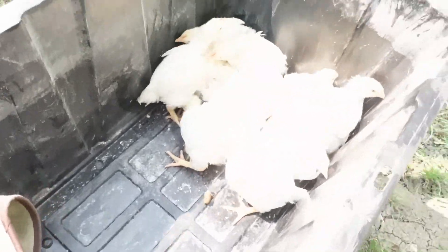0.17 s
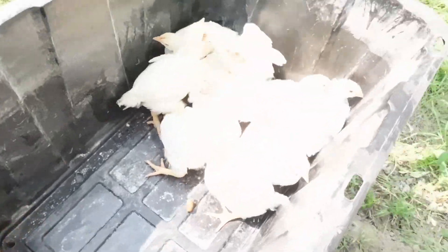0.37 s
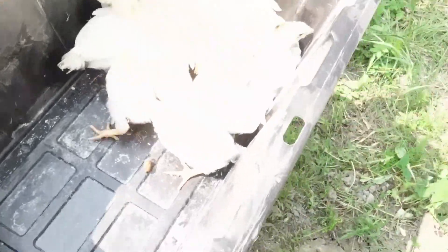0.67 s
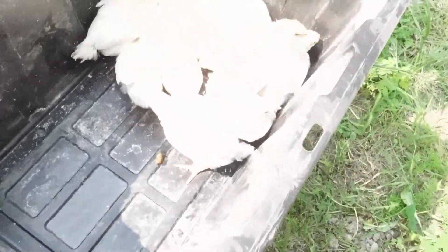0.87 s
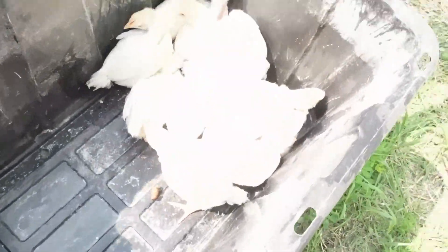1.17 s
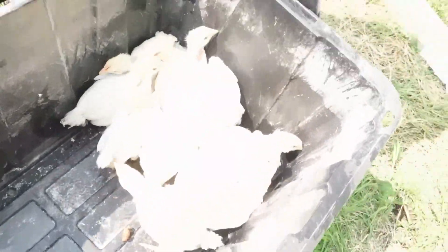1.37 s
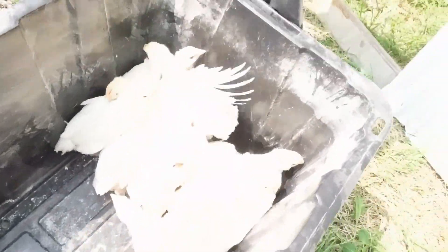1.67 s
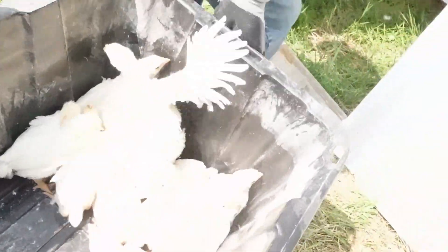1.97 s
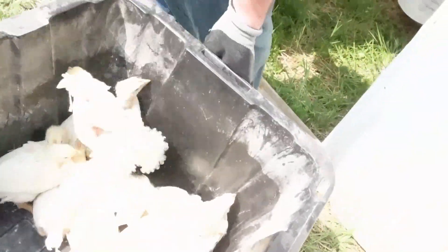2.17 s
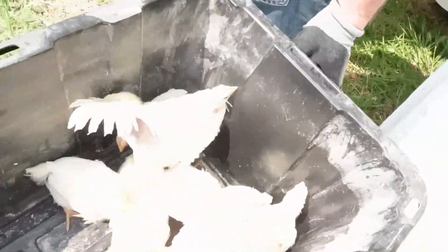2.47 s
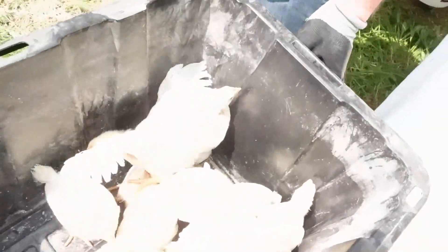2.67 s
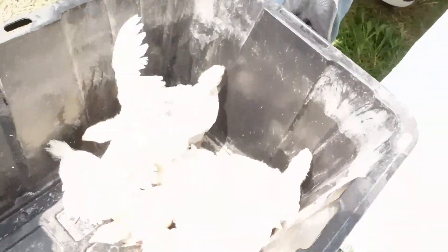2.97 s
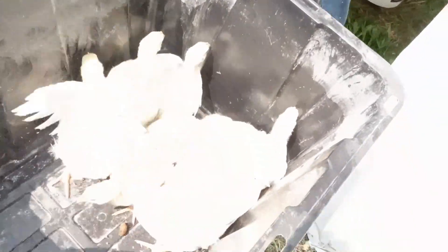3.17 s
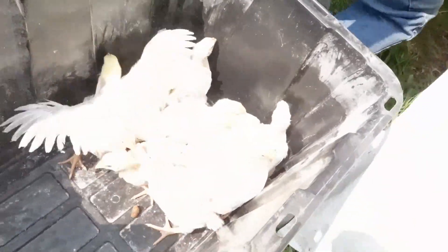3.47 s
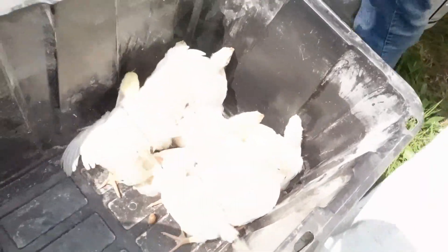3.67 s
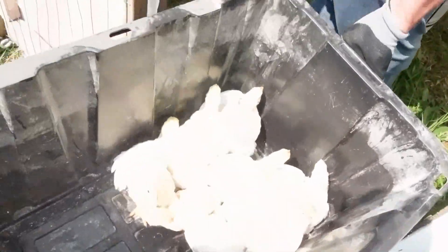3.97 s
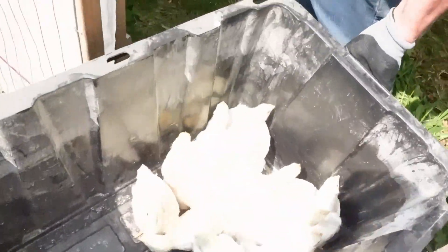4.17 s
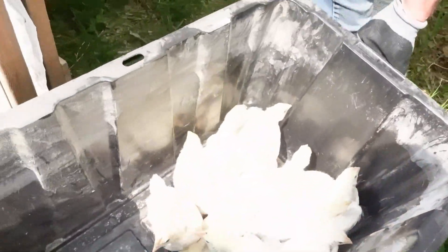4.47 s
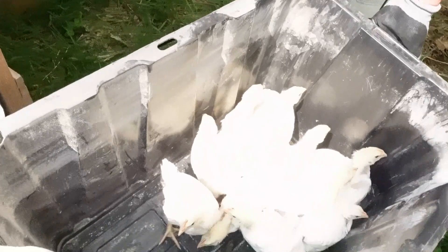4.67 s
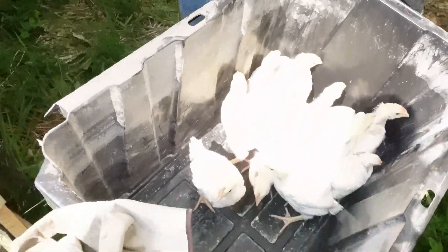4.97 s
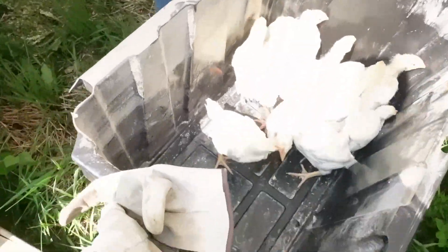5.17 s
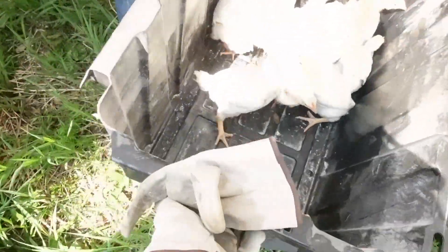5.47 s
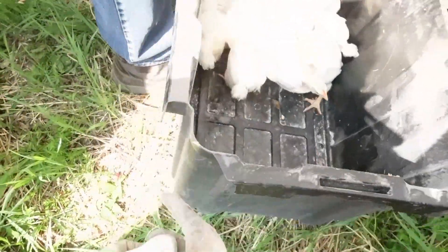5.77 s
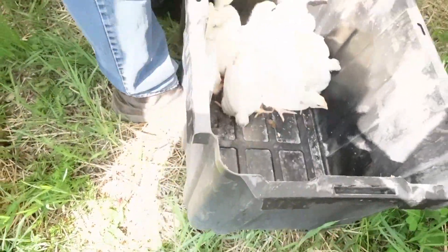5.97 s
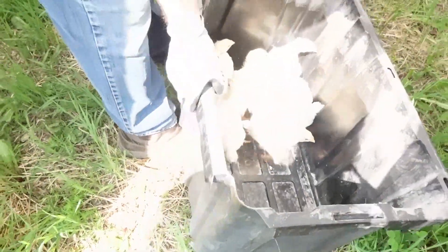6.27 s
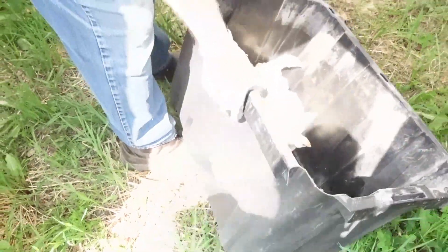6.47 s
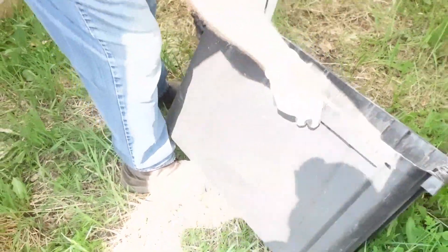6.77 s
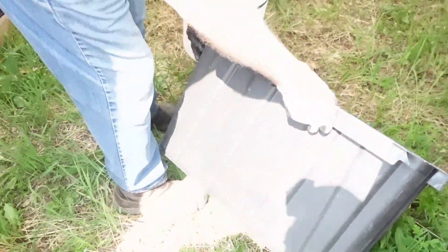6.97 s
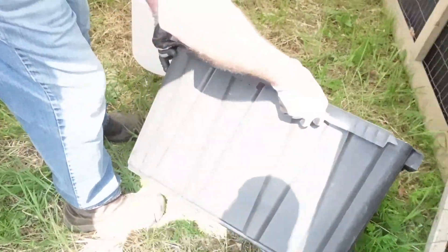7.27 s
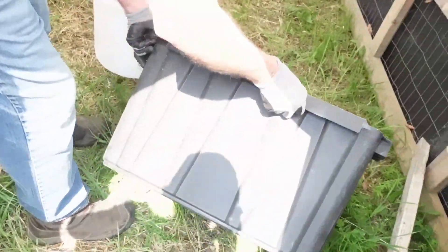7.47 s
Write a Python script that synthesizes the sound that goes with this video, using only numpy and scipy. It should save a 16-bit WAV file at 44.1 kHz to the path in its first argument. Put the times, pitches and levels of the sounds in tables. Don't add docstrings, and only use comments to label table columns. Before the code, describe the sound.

Close above a plastic bin outdoors, young chickens utter short, near-pure whistles that slide quickly downward, over faint steady air. From 0 to 1.5 seconds the peeps come often; claws scramble and the rim gives a buzzing creak at about 0.4 to 0.6. From 1.5 to 2.3 wings beat and rustle, claws tick sharply, the plastic knocks, and calls become shrill, wavering warbles, one cracking. Low thumps come near 2.5. Around 3 to 4 there are shifting feet, brushes and loud hoarse-edged peeps, then fewer knocks, soft feathers, a swish near 4.7 and a faint far hum around 4 to 6. A thump at 5.0 leads into crowded overlapping peeps and a hard scramble near 5.6. After 6.4 calls are duller and blurred as bodies slide, ending in dense scrabbling and knocks until 7.7. Short wall echoes, thin bass.

```python
import sys
import numpy as np
from scipy import signal
from scipy.io import wavfile
from scipy.ndimage import uniform_filter1d

SR = 44100
rng = np.random.default_rng(int(sys.argv[2]) if len(sys.argv) > 2 else 0)


def output_pcm(signal):
    pcm = np.clip(np.atleast_2d(signal).T, -1, 1) * 32767
    wavfile.write(sys.argv[1], SR, np.round(pcm).astype(np.int16))


def convert_level_to_amplitude(level_db):
    exponent = np.asarray(level_db, float) / 20
    return 10 ** exponent


N = 335601

# (frequency [Hz], level per Hz [dB])
AIR_COLOUR = [(24, -71), (40, -25), (202, -1.5), (1450, 3), (2390, -4), (10100, -30), (15500, -36)]
AIR_DB = -58.5

# (start [s], length [s], from [Hz], to [Hz], loudest [dB])
STRAIGHT_PEEPS = [(0.034, 0.062, 3760, 1826, -33), (0.1, 0.031, 2600, 1960, -33),
                  (0.218, 0.032, 3040, 2170, -28.5), (0.406, 0.042, 3650, 2210, -27),
                  (0.463, 0.03, 2500, 1715, -29), (0.494, 0.061, 2560, 2350, -31),
                  (0.696, 0.024, 3050, 1510, -25), (0.817, 0.032, 3630, 2410, -34),
                  (0.941, 0.03, 4030, 2820, -34), (1.3, 0.0088, 2774, 2130, -25),
                  (1.307, 0.025, 2800, 2330, -30), (1.346, 0.036, 2800, 1740, -31.5),
                  (1.389, 0.038, 3870, 2180, -25), (1.437, 0.048, 3570, 1857, -30.5),
                  (1.498, 0.058, 3094, 1436, -26.5), (2.015, 0.024, 3480, 2050, -26),
                  (2.587, 0.023, 3560, 1750, -26), (2.9, 0.037, 3480, 1817, -24),
                 (3.312, 0.029, 2950, 2230, -38), (3.894, .04, 3870, 1750, -26),
                 (4.071, 0.046, 3344, 1333, -23.5), (4.662, 0.032, 2810, 2060, -33.5),
                 (4.84, 0.042, 2390, 1950, -35.5), (5.14, 0.047, 2390, 1910, -33),
                 (5.163, 0.042, 3340, 2250, -31), (5.194, 0.038, 2318, 2050, -28.5),
                 (5.191, 0.039, 3364, 2300, -29), (5.441, 0.046, 3294, 2280, -27.5),
                 (5.504, 0.055, 3900, 2430, -32), (5.647, 0.045, 4070, 2360, -31.5),
                 (5.818, 0.036, 2450, 1670, -35),
                  (5.85, 0.068, 3895, 1893, -28), (5.949, 0.069, 2760, 1710, -31),
                (5.941, 0.083, 3210, 1930, -35.5), (5.994, 0.025, 3480, 2990, -35),
                (6.02, 0.037, 2750, 2070, -25), (6.064, 0.046, 3630, 1740, -40.5),
                (6.109, 0.025, 2910, 2300, -32.5), (6.232, 0.054, 3580, 3100, -38),
                (6.429, 0.04, 3280, 2300, -33.5), (6.655, 0.04, 3520, 1870, -34),
                (6.774, 0.054, 2930, 2126, -33), (6.956, 0.041, 3120, 2300, -34.5),
                (7.006, 0.044, 3385, 1780, -28), (7.05, 0.04, 3760, 2505, -33.5),
                (7.188, 0.039, 2626, 1950, -36.5), (7.266, 0.014, 2795, 2150, -33),
                (7.294, 0.015, 2460, 1750, -34), (7.349, 0.014, 2300, 1600, -38),
                (7.316, 0.042, 3060, 2330, -35),
                  (0.068, 0.013, 3100, 2300, -25.5), (0.21, 0.019, 3700, 3160, -40),
                (0.339, 0.027, 3170, 2900, -39.5), (1.148, 0.011, 3300, 3050, -48.5),
                (1.313, 0.027, 1900, 2100, -39), (1.471, 0.016, 2050, 1930, -28),
                (1.479, 0.027, 2600, 2300, -29), (1.73, .022, 3650, 3450, -32.5),
                (1.771, 0.011, 2700, 1974, -24), (2.242, 0.0055, 2100, 2660, -23),
                (3.134, 0.016, 3700, 3310, -33.5), (4.015, 0.0037, 1900, 2540, -33.5),
                (5.066, 0.035, 2700, 1995, -35), (5.225, 0.024, 2550, 2430, -30),
                (7.11, 0.031, 3600, 3520, -41), (5.42, .018, 3050, 3160, -42),
                (5.56, 0.033, 3550, 3520, -39.5), (6.037, 0.018, 3150, 2630, -32),
                (6.056, 0.025, 2550, 2344, -27.5), (6.097, 0.011, 3350, 3130, -39),
                (6.475, 0.039, 4100, 2980, -27), (6.516, 0.038, 2900, 2213, -38),
                (6.499, 0.067, 3400, 1870, -28), (6.742, 0.029, 3200, 3010, -42),
                (7.091, 0.066, 2500, 1820, -35), (7.572, 0.014, 2300, 2070, -33)]
# (start [s], length [s], from [Hz], to [Hz], loudest [dB])
HOOKED_PEEPS = [(0.526, .076, 3604, 2110, -24.5), (0.886, 0.06, 3634, 2150, -21.5),
                (3.527, 0.061, 3540, 1585, -20.5), (1.589, 0.066, 4000, 2210, -35.5),
                (6.182, .055, 3600, 2260, -32.5), (6.356, 0.06, 3430, 1915, -32.5),
                (6.849, 0.078, 3714, 1470, -28.5), (4.6, .066, 3740, 1853, -22),
                (4.768, .08, 3703, 1750, -22.5), (5.352, .075, 3544, 1613, -29.5),
                (5.728, 0.095, 3700, 1788, -32)]
HOOK_HOLD, HOOK_SAG = 0.36, 0.1
# (start [s], length [s], from [Hz], to [Hz], loudest [dB])
DROOPING_PEEPS = [
    (.358, .082, 2850, 1650, -26),
    (1.148, .064, 2720, 1800, -29),
    (5.484, 0.046, 2314, 1900, -24),
    (6.294, .097, 2750, 1750, -33),
    (5.244, 0.046, 2400, 1750, -30),
]
DROOP_HOLD, DROOP_SAG = 0.75, 0.42
# (time [s], pitch [Hz], level [dB])
WARBLES = [
    [(1.103, 3084, -42), (1.132, 3080, -35.5), (1.142, 2265, -21), (1.156, 1600, -28.5), (1.172, 1526, -38)],
    [(1.765, 3300, -30), (1.778, 3450, -36), (1.79, 2710, -23.5), (1.803, 3424, -25.5),
     (1.818, 2830, -26.5), (1.832, 3400, -27)],
    [(1.272, 3250, -43), (1.287, 3150, -31), (1.305, 1940, -30), (1.333, 1500, -30)],
    [(1.911, 2320, -26.5), (1.924, 3370, -34), (1.944, 2660, -30), (1.965, 3100, -28)],
    [(2.078, 1960, -24.5), (2.09, 2990, -28), (2.108, 3280, -23), (2.117, 2556, -27.5), (2.13, 3140, -32),
     (2.146, 2950, -26.5)],
    [(2.26, 3200, -29), (2.272, 3155, -27), (2.28, 2850, -31), (2.29, 3200, -33), (2.302, 2790, -27),
     (2.32, 1950, -28)],
    [(2.438, 2145, -26), (2.446, 2860, -26.5), (2.459, 3290, -36), (2.477, 2300, -29.5)],
    [(3.183, 3780, -28.5), (3.208, 3780, -41), (3.216, 3620, -38), (3.227, 3400, -24), (3.251, 2440, -23),
     (3.26, 1930, -31)],
    [(4.45, 2190, -36), (4.474, 3060, -38), (4.5, 3190, -52), (4.53, 2900, -35.5), (4.55, 2160, -32),
     (4.567, 2010, -44)],
    [(4.487, 2900, -44), (4.51, 2500, -31.5), (4.535, 2310, -30.5), (4.548, 1870, -32)],
    [(4.69, 3560, -40), (4.715, 2520, -25), (4.745, 1970, -34.5)],
    [(4.942, 3760, -45), (4.975, 2510, -37.5), (5.0, 2200, -34)],
    [(4.988, 3320, -37), (5.0, 3320, -33.5), (5.03, 3230, -44), (5.05, 2370, -27), (5.085, 1840, -43)],
    [(1.667, 3050, -49), (1.685, 3490, -39), (1.715, 3345, -42), (1.74, 2456, -23.5), (1.76, 2216, -34),
     (1.782, 1674, -31)],
]
# (start [s], end [s], level [dB], lowest [Hz], held note [Hz])
HOARSE_STARTS = [(0.854, 0.9, -39, 2700, 4460), (2.53, 2.592, -41, 2300, 3950),
                 (2.869, 2.9, -40.5, 960, 3900), (3.162, 3.218, -32, 700, 3750),
                 (3.476, 3.552, -29, 1200, 3500), (3.842, 3.9, -36, 2900, 3880),
                 (4.02, 4.078, -37, 1600, 3820), (2.14, 2.162, -32, 680, 3030),
                 (1.352, 1.398, -39, 2400, 3800), (5.835, 5.862, -44, 3200, 3900),
                 (6.455, 6.505, -37, 2400, 3400), (1.958, 2.01, -39, 3200, 4000),
                 (2.255, 2.312, -38, 1500, 3720), (6.925, 7.012, -39, 3000, 3550)]

THROAT_HZ, ABOVE_DB, BELOW_DB, SWELL_DB = 2300, 26.5, 37, 1.5
FLUTTER_DB = 2.0
ALARM_START_S, ALARM_END_S, ALARM_DB = 1.9, 2.33, 21
BEAK_HZ, BEAK_WIDTH_HZ = 5650, 380
CRACK_START_S, CRACK_END_S, CRACK_DB = 2.122, 2.144, -5
EASY_DB = -2.5
TURNED_S, TURNED_BREATH_DB, TURNED_DULL_DB, TURNED_ECHO = 6.42, -7, -8, 0.3
RASP_HZ, RASP_DB, RASP_NOISE_DB = 452, -4, -4

# (frequency [Hz], level [dB], 60 dB decay [s])
BIN_MODES = [(200, -16, 0.075), (355, -29.5, 0.19), (558, -10.5, 0.061), (733, -2.5, 0.013),
             (1140, -5, 0.0097), (1750, -24, 0.066), (2660, -53, 0.026)]
# (frequency [Hz], level [dB], 60 dB decay [s])
RIM_MODES = [(340, -4, 0.0085), (650, 0, 0.01), (1200, -3, 0.018), (2100, -0.5, 0.0083)]
# (start [s], end [s], claws [dB], feathers [dB])
BOUTS = [
    (0.233, 0.307, -47.5, -62.5),
    (0.512, 0.706, -41, -56.5),
    (1.525, 2.245, -45, -51.5),
    (3.03, 3.39, -44, -61),
    (4.094, 4.603, -62, -55),
    (5.546, 5.666, -36.5, -47),
    (5.805, 5.948, -47.5, -51),
    (6.593, 7.32, -47, -52),
    (7.37, 7.7, -36.5, -50),
]
CLAWS_DB, CLAWS_DB_PER_S, FEATHERS_DB, FEATHERS_DB_PER_S = -58, 194, -57, 18
# (frequency [Hz], level per Hz [dB])
FEATHER_COLOUR = [(180, -109), (300, -7.5), (808, 5.5), (1370, 7), (3750, 6), (6250, 1.5), (15500, -14)]
# (time [s], peak [dB], pitch of the struck
# panel [Hz])
KNOCKS = [(0.244, -20.5, 487), (0.308, -17, 616), (0.664, -18, 564), (0.682, -14.5, 320),
          (1.104, -22, 1100), (1.602, -15.5, 575), (1.675, -16.5, 920), (1.716, -24.5, 320),
          (1.756, -20, 235), (1.859, -15.5, 780), (1.908, -13.5, 970), (1.932, -18, 530),
          (2.012, -16.5, 904), (2.137, -20.5, 1280), (2.414, -17.5, 620), (2.443, -14.5, 540),
          (2.505, -20, 340), (2.526, -14.5, 613), (2.652, -17.5, 540), (2.78, -18.5, 504),
          (2.991, -18.5, 596), (3.025, -17.5, 620), (3.055, -19, 560), (3.147, -16.5, 536),
          (3.277, -25.5, 560), (3.685, -19, 955),
          (3.871, -16.5, 1266), (5.024, -21, 510), (5.29, -15, 827), (5.477, -18, 730), (5.537, -17.5, 695),
         (5.556, -18, 860), (5.615, -15, 890), (5.798, -15, 900), (5.91, -19.5, 785), (6.394, -22, 355),
         (6.708, -18, 806), (6.73, -15.5, 785), (6.881, -20, 790), (6.985, -18.5, 510), (7.119, -18, 1290),
         (7.191, -19, 560), (7.228, -20, 243), (7.337, -22.5, 253), (7.372, -19.5, 516), (7.396, -18, 536),
         (7.439, -17, 270), (7.534, -14, 850)]
# (time [s], peak [dB], pitch of the struck panel [Hz])
TAPS = [(0.58, -19, 530), (0.808, -35, 525), (1.381, -38, 1250), (1.456, -26, 550), (1.561, -27, 1470),
        (1.765, -21, 766), (1.829, -19, 1460), (1.888, -22, 530), (2.071, -25, 1390), (2.097, -29, 826),
        (2.172, -23.5, 1110), (2.219, -25.5, 1140), (2.63, -33, 548), (2.717, -28.5, 770),
        (2.808, -27.5, 560), (2.909, -31, 480), (3.094, -30, 947), (3.117, -27.5, 530), (3.206, -19.5, 613),
        (3.368, -30, 980), (3.469, -33.5, 525), (4.216, -34, 1060), (4.286, -33, 1370), (5.135, -34, 1060),
        (5.174, -26, 1050), (5.603, -17.5, 1510), (5.643, -19, 480), (5.676, -25, 690), (5.978, -29, 340),
        (6.364, -28.5, 770), (6.477, -28, 1350), (6.518, -27.5, 1200), (6.538, -35, 640), (6.75, -19, 729),
        (6.781, -25.5, 554), (6.825, -19, 1300), (6.838, -23, 534), (6.93, -28, 540), (7.028, -26, 493),
        (7.066, -26, 770), (7.164, -28.5, 538), (7.419, -20, 500), (7.504, -19.5, 1390), (7.561, -23, 493),
        (7.597, -25, 721)]
# (start [s], end [s], level [dB], slips a second at start [Hz], at end [Hz])
CREAKS = [
    (0.368, 0.483, -32, 300, 360),
    (0.493, 0.627, -32, 380, 420),
]
# (time [s], peak [dB])
TICKS = [(0.665, -25.5), (1.6715, -30), (1.719, -23.5), (1.759, -22), (1.8297, -23), (1.862, -19.5),
         (1.8866, -25), (1.9053, -20), (1.934, -23), (1.9864, -32), (2.01, -18), (2.071, -24),
         (2.1391, -17), (2.2209, -19.5), (2.5608, -26.5), (2.968, -27.5), (3.0872, -27.5), (3.1283, -25.5),
         (3.1704, -16), (3.2027, -18.5), (3.2618, -18.5), (3.3661, -18.5), (3.8694, -24), (5.024, -24.5),
         (5.2792, -23.5), (5.641, -28), (5.935, -26.5), (6.426, -18), (6.729, -18.5), (7.12, -18),
         (7.2464, -23.5), (7.5979, -19)]
# (time [s], peak [dB], pitch [Hz])
THUMPS = [(0.685, -38, 280), (0.985, -38, 226), (1.492, -24, 260), (1.577, -29, 226), (1.755, -20, 236),
          (1.872, -25, 208), (2.45, -18, 177), (2.529, -15.5, 182), (2.653, -32, 215), (2.78, -25, 169),
          (3.056, -22, 222), (3.281, -23, 184), (3.877, -27, 176), (5.027, -15, 190), (5.562, -29, 260),
          (5.805, -24, 223), (6.749, -29, 229), (7.192, -29, 221), (7.232, -22.5, 228), (7.34, -36, 237),
          (7.535, -27, 253)]
THUMP_S, THUMP_RISE_S = 0.051, 0.002
# (middle [s], half length [s], level [dB])
SWISHES = [
    (1.06, 0.035, -38),
    (3.016, 0.035, -39),
    (3.242, 0.16, -45.5),
    (3.877, 0.56, -49.5),
    (4.683, 0.12, -37.5),
]
# (frequency [Hz], level per Hz [dB])
SWISH_COLOUR = [(800, -6), (5000, 2.5), (8000, 2.5), (15500, -12)]


def evened(x):
    return x / np.sqrt(np.mean(x ** 2) + 1e-20)


def add(mix, s, sound, pan_db):
    part = mix[:, round(s * SR):][:, :len(sound)]
    part += sound[:part.shape[1]] * convert_level_to_amplitude(np.array([[pan_db], [-pan_db]]) / 2)


def band(x, lo_hz, hi_hz):
    return signal.sosfilt(signal.butter(2, [lo_hz, hi_hz], "band", fs=SR, output="sos"), x)


def ring(hz, t60, size=2600):
    t = np.arange(size) / SR
    return convert_level_to_amplitude(-60 * t / t60) * np.sin(2 * np.pi * hz * t)


def ringing(modes):
    return sum(convert_level_to_amplitude(db) * ring(hz, t60) for hz, db, t60 in modes)


def hiss(colour, same, patchy_db):
    frames, hz = N // 128 + 5, np.fft.rfftfreq(512, 1 / SR)
    a, b, c, d, patches = rng.standard_normal((frames, 257, 5)).T
    patches = uniform_filter1d(patches, 150, 0)
    patches = evened(uniform_filter1d(patches, 3, 1))
    left = a + 1j * b
    right = same * left + np.sqrt(1 - same ** 2) * (c + 1j * d)
    f, db = np.transpose(colour)
    level_db = np.interp(np.log(hz + 1), np.log(f), db)[:, None] + patchy_db * patches
    z = np.array([left, right]) * convert_level_to_amplitude(level_db)
    return signal.istft(z, nperseg=512, noverlap=384)[1][:, :N]


def open_air():
    return convert_level_to_amplitude(AIR_DB) * evened(hiss(AIR_COLOUR, same=0.98, patchy_db=1.0))


def flock():
    mix = np.zeros((2, N))
    pressed = [glide(*row, HOOK_HOLD, HOOK_SAG) for row in HOOKED_PEEPS]
    easy = [glide(*row) for row in STRAIGHT_PEEPS]
    easy += [glide(*row, DROOP_HOLD, DROOP_SAG) for row in DROOPING_PEEPS]
    easy += WARBLES + faint_peeps()
    for k, rows in enumerate(pressed + easy):
        turned = rows[0][0] > TURNED_S
        second_db = -19 + EASY_DB * (k >= len(pressed)) + TURNED_DULL_DB * turned
        breath_db = TURNED_BREATH_DB if turned else -18
        s, sound = peep(rows, second_db, breath_db, echo=TURNED_ECHO if turned else 0.1)
        drift_db = np.interp(s, [0, 2.5, 5], [-0.7, 0.4, -2.6])
        add(mix, s, sound, drift_db + 2.2 * rng.standard_normal())
    for row in HOARSE_STARTS:
        add(mix, row[0], rasp(*row), -0.6)
    walls = rng.standard_normal((2, 3000)) * convert_level_to_amplitude(-39.5 - 60 * np.arange(3000) / SR / 0.072)
    walls[:, :100] = 0
    walls[:, 0] = 1
    return signal.oaconvolve(mix, walls, axes=1)[:, :N]


def glide(start, length, from_hz, to_hz, db, hold=0, sag=0):
    u = np.linspace(0, 1, num=9)
    fallen = np.interp(u, [-1e-9, hold, 1], [0, sag, 1])
    hz = from_hz + (to_hz - from_hz) * fallen
    octaves = np.log2(hz / THROAT_HZ)
    loss = np.where(octaves > 0, ABOVE_DB, BELOW_DB) * octaves ** 2 + SWELL_DB * (1 - u)
    return np.transpose([start + u * length, hz, db - loss + loss.min()])


def peep(rows, second_db, breath_db, echo, third_db=-37, waver=0.016):
    s, hz, db = np.transpose(rows)
    slope = np.clip((hz[-1] - hz[-2]) / (s[-1] - s[-2] + 1e-4), -4e4, 0)
    lead = min(0.011, 0.4 * (s[-1] - s[0]))
    s = np.r_[s[0] - lead, s, s[-1] + 0.006]
    hz = np.r_[0.9 * hz[0], hz, hz[-1] + 0.004 * slope]
    db = np.r_[db[0] - 18, db, db[-1] - 16]
    t = np.arange(s[0], s[-1], 1 / SR)
    hz = uniform_filter1d(np.interp(t, s, hz), 110, mode="nearest")
    slow, fast = rng.standard_normal((2, 9000))[:, :len(t)]
    wavering_hz = hz * (1 + waver * evened(uniform_filter1d(slow, 150)))
    turn = 2 * np.pi * np.cumsum(wavering_hz) / SR
    tone = np.sin(turn) * (1 + convert_level_to_amplitude(breath_db) * evened(uniform_filter1d(fast, 30)))
    alarmed = ALARM_START_S < s[0] < ALARM_END_S
    shrill_db = ALARM_DB * alarmed / (1 + ((2 * hz - BEAK_HZ) / BEAK_WIDTH_HZ) ** 2)
    strain = hz / 2500 * convert_level_to_amplitude(shrill_db)
    tone += strain * (convert_level_to_amplitude(second_db) * np.sin(2 * turn) + convert_level_to_amplitude(third_db) * np.sin(3 * turn))
    cracked = (t > CRACK_START_S) & (t < CRACK_END_S)
    tone += convert_level_to_amplitude(CRACK_DB) * cracked * (np.sin(turn / 2) + np.sin(turn + turn / 2))
    flutter = uniform_filter1d(uniform_filter1d(fast, 330), 330)
    tone *= convert_level_to_amplitude(FLUTTER_DB * evened(flutter))
    edge = np.clip(np.minimum(t - t[0], t[-1] - t) / 0.0015, 0, 1)
    tone *= np.sqrt(2) * convert_level_to_amplitude(np.interp(t, s, db)) * edge ** 2
    wall = np.zeros(rng.integers(90, 210))
    near = np.append(tone, wall) + 0.55 * np.append(wall, tone)
    far = np.zeros(3 * len(wall))
    return t[0], np.append(near, far) + echo * np.append(far, near)


def faint_peeps(count=30, top_db=-51):
    calls = []
    for when, high, fall, length, weak in rng.random((count, 5)):
        s, hz, db = when * (N / SR - 0.2) + 0.056, 2900 + 900 * high, top_db - 8 * weak
        end = s + 0.025 + 0.03 * length
        calls.append([(s, hz, db - 6), (end, hz * (0.72 - 0.1 * fall), db)])
    return calls


def stirring(column, rest_db, db_per_s):
    t = np.arange(N) / SR
    bouts = []
    for row in BOUTS:
        away_s = np.maximum(np.maximum(row[0] - t, t - row[1]), 0)
        bouts.append(row[column] - db_per_s * away_s)
    return convert_level_to_amplitude(np.maximum(np.max(bouts, axis=0), rest_db))


def scrabble(per_s=400, spread_db=4.5, scratch_db=-8):
    size = convert_level_to_amplitude(spread_db * np.minimum(rng.exponential(1, N), 4)) * (rng.random(N) < per_s / SR)
    mode = rng.integers(0, len(BIN_MODES), N)
    body = np.zeros(N)
    for k, (hz, db, t60) in enumerate(BIN_MODES):
        body += signal.oaconvolve(size * (mode == k), convert_level_to_amplitude(db) * ring(hz, 0.35 * t60))[:N]
    slips = signal.oaconvolve(size, np.exp(-np.arange(600) / 51.0))[:N] * rng.standard_normal((2, N))
    slips = band(slips.mean(0) + 0.32 * slips, 890, 3100)
    scratching = body / np.std(band(body, 140, 1430)) + convert_level_to_amplitude(scratch_db) * evened(slips)
    return stirring(2, CLAWS_DB, CLAWS_DB_PER_S) * scratching


def feathers():
    rustle = hiss(FEATHER_COLOUR, same=0.72, patchy_db=3.0)
    rustle /= np.std(band(rustle, 6850, 9540))
    return stirring(3, FEATHERS_DB, FEATHERS_DB_PER_S) * rustle


def knock(db, hz, blow_s=0.0092, body_db=-6.5, panel_s=0.016, snap_db=-6):
    t = np.arange(900) / SR
    grit, spread = rng.standard_normal((2, 900))
    blow = grit * np.exp(-t / blow_s) * (abs(spread) > 1.6)
    blow[0] = 4
    body = ringing([(f, d + 4.7 * e, t60) for (f, d, t60), e in zip(BIN_MODES[1:], spread)])
    thud = signal.fftconvolve(blow, ring(hz, panel_s) + convert_level_to_amplitude(body_db) * body)
    thud /= abs(thud).max()
    snap = band(grit * np.exp(-t / 0.01), 680, 1860)
    thud[:900] += convert_level_to_amplitude(snap_db) * snap / abs(snap).max()
    return convert_level_to_amplitude(db) * np.append(np.zeros(90), thud)


def creak(start, end, db, from_hz, to_hz, jitter=0.32, edge_db=-2.5):
    pace, size = rng.standard_normal((2, 8000))[:, :round((end - start) * SR)]
    n = len(pace)
    rate = np.linspace(from_hz, to_hz, n) * (1 + jitter * evened(uniform_filter1d(pace, 80)))
    slips = np.diff(np.floor(np.cumsum(rate) / SR), prepend=0)
    slips *= convert_level_to_amplitude(1.5 * size) * signal.windows.tukey(n, 0.05)
    body = signal.fftconvolve(slips, ringing(RIM_MODES))[:n]
    scrape = signal.lfilter([1], [1, -0.97], abs(slips))
    buzz = band(size * scrape, 1300, 4200)
    return convert_level_to_amplitude(db) * (evened(body) + convert_level_to_amplitude(edge_db) * evened(buzz))


def tick(db):
    crack = band(rng.standard_normal(700) * np.exp(-np.arange(700) / SR / 0.003), 1200, 13000)
    crack = signal.lfilter([1], [1, -0.6], crack)
    return convert_level_to_amplitude(db) * crack / abs(crack).max()


def thump(db, hz):
    rise = 1 - np.exp(-np.arange(5000) / SR / THUMP_RISE_S)
    return convert_level_to_amplitude(db) * ring(hz, THUMP_S, size=5000) * rise


def rasp(start, end, db, lo_hz, held_hz):
    fuzz, air, drift = rng.standard_normal((3, 4000))
    rate = RASP_HZ * (1 + 0.104 * evened(uniform_filter1d(drift, 200)))
    turn = 2 * np.pi * np.cumsum(rate) / SR
    flap = 1 + convert_level_to_amplitude(RASP_DB) * (np.cos(turn) + np.cos(2 * turn))
    note = band(band(fuzz, held_hz - 110, held_hz + 110) * flap, lo_hz, held_hz + 900)
    throat = band(band(air, lo_hz, 5400), lo_hz, 5400)
    sound = evened(note) + convert_level_to_amplitude(RASP_NOISE_DB) * evened(throat)
    sound = sound[:round((end - start) * SR)]
    return convert_level_to_amplitude(db) * sound * signal.windows.tukey(len(sound), 0.55)


def swishes():
    t = np.arange(N) / SR
    swell = sum(convert_level_to_amplitude(db) * np.exp(-((t - s) / half) ** 2) for s, half, db in SWISHES)
    return swell * evened(hiss(SWISH_COLOUR, same=0.62, patchy_db=1.5))


def far_hum(middle_s=5, half_s=1.24, db=-51.5):
    swell = np.exp(-((np.arange(N) / SR - middle_s) / half_s) ** 4)
    hum = band(hiss(AIR_COLOUR, same=1.0, patchy_db=5.0), 805.5, 1402)
    return convert_level_to_amplitude(db) * swell * evened(hum)


def scene():
    mix = open_air() + flock() + scrabble() + feathers()
    for s, *blow in KNOCKS + TAPS:
        add(mix, s, knock(*blow), 1.55 * rng.standard_normal() - 0.14 * s)
    for row in CREAKS:
        add(mix, row[0], creak(*row), -0.5)
    for s, db in TICKS:
        add(mix, s, tick(db), 3 * rng.standard_normal())
    for s, *blow in THUMPS:
        add(mix, s, thump(*blow), 0)
    return mix + swishes() + far_hum()


def roll_off(x):
    return signal.sosfilt(signal.butter(12, 16470, fs=SR, output="sos"), x)


def record(dry):
    limited = 0.4 * np.tanh(dry / 0.4)
    cut = signal.sosfilt(signal.butter(4, 160, "high", fs=SR, output="sos"), limited)
    cut += convert_level_to_amplitude(-34) * dry
    side = signal.sosfilt(signal.butter(1, 220, "low", fs=SR, output="sos"), cut[0] - cut[1]) / 2
    near_mono = cut - np.array([side, -side])
    edge = signal.firwin(301, 15600, window=("kaiser", 9), fs=SR)
    return roll_off(signal.oaconvolve(near_mono, edge[None], "same", axes=1))


dry = scene()
out = record(dry)
output_pcm(out)
```